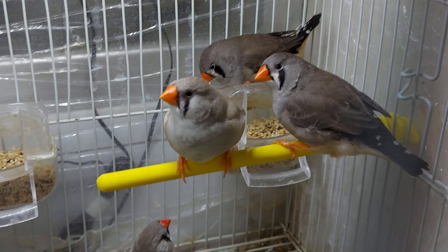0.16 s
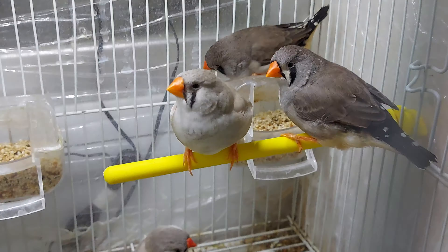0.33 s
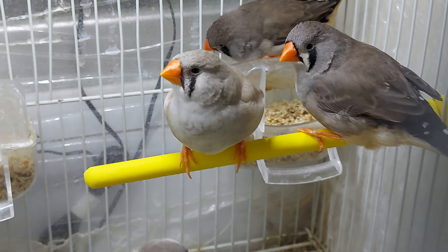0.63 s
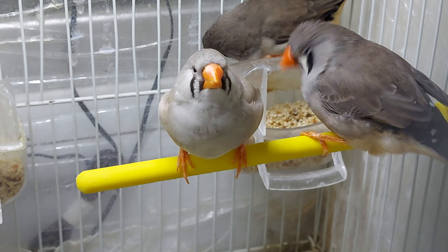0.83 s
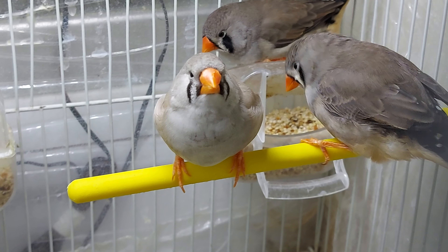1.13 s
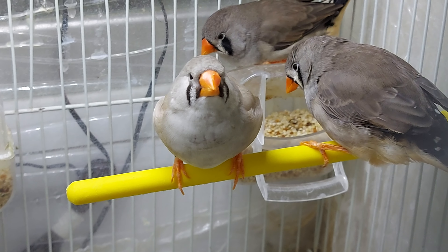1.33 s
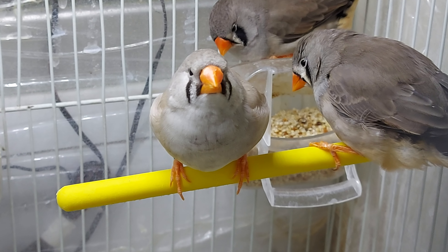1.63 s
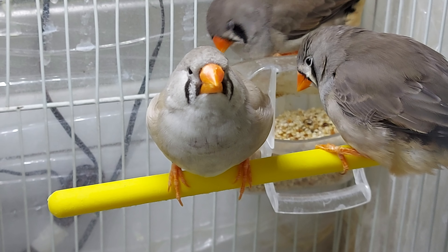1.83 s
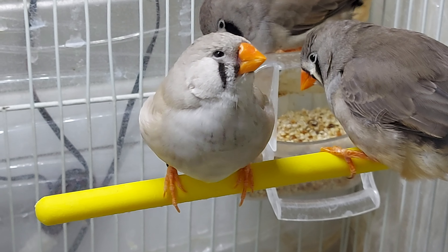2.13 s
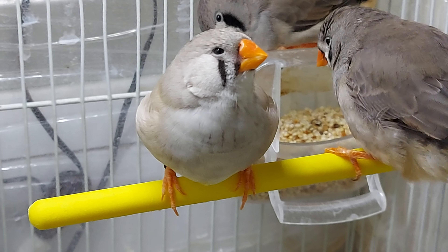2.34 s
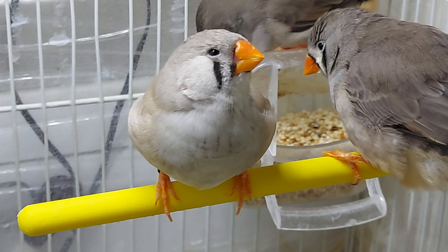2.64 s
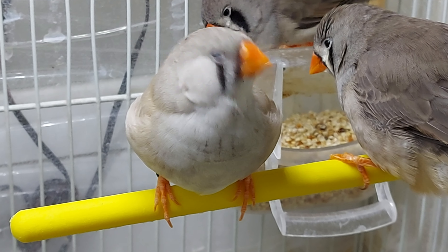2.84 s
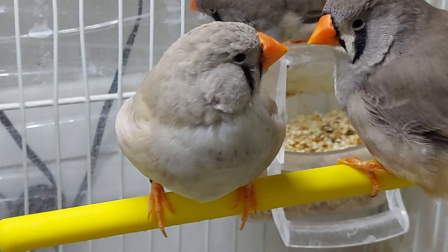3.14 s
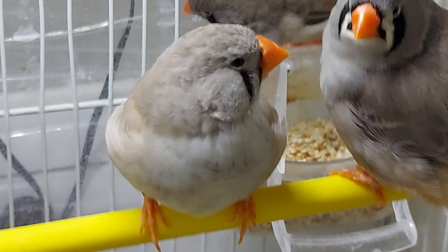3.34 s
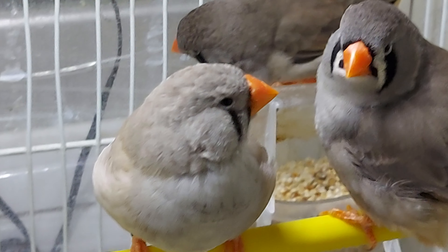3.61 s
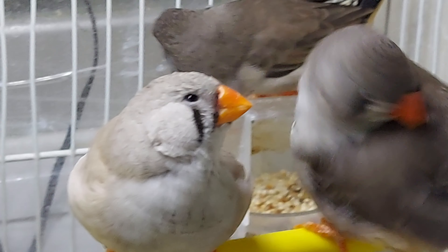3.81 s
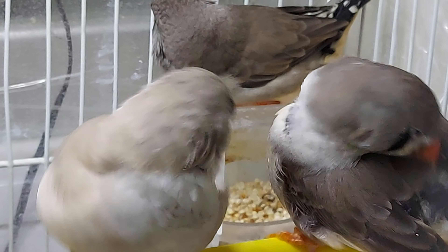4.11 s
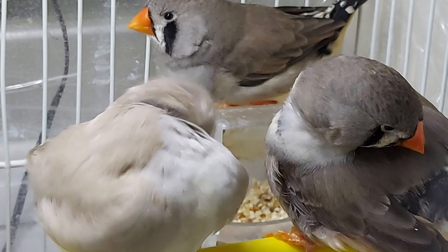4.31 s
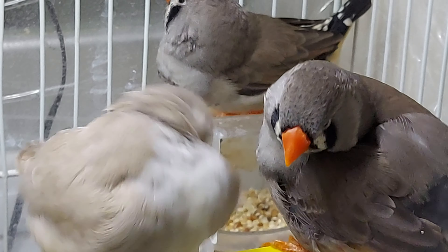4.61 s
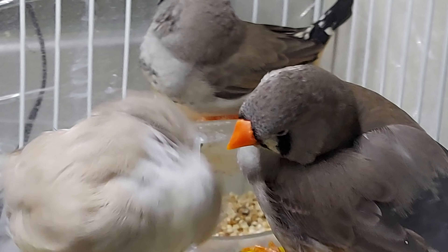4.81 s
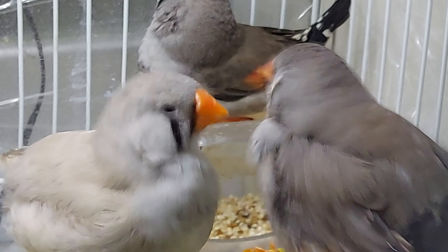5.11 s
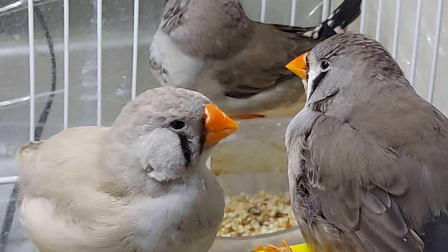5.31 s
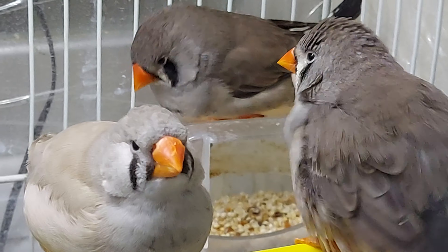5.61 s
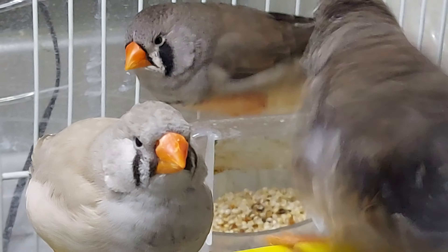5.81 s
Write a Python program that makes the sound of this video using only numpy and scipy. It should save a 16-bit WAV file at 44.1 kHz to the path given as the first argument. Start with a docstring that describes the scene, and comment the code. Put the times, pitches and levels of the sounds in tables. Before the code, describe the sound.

A low hum dies away and a zebra finch gives two quick, loud, rasping calls from a little way off. Quieter nasal notes and a short rough squawk answer from a perch right by the microphone, among light ticks, faint seed crackle, thin whistles and feather shuffles. A bird shakes its wings to finish. The wire cage stands in a small room, and the hand-held microphone rumbles softly and is bumped twice.

```python
"""Two loud zebra finch calls arch and fall into a rasp; soft nasal notes and a squawk answer.
The birds are in a wire cage in a small room, the microphone a hand-held phone close to the perch,
the loud caller further off to the right. Each voice is a pulsing syrinx shaped by throat and beak.
Beaks and claws tick, feathers rustle, thin whistles pass, and wings whirr at the end.
A low hum dies away at the start; the hand rumbles and twice knocks the left microphone port."""
import sys
import numpy as np
from scipy import signal
from scipy.fft import rfft, irfft, next_fast_len
from scipy.io import wavfile
from scipy.ndimage import uniform_filter1d

SR = 44100
rng = np.random.default_rng(int(sys.argv[2]) if len(sys.argv) > 2 else 0)


def master_out(mix):
    """Clip the mix to full scale and print it as 16-bit PCM to the path in sys.argv[1]."""
    frames = np.transpose(np.atleast_2d(mix))
    ceiling = np.clip(frames, -1, 1)
    pcm = np.round(ceiling * 32767).astype(np.int16)
    wavfile.write(sys.argv[1], SR, pcm)


N = 262395
TIME = np.arange(N) / SR
TOP_HZ = 16050


def undb(db):
    """Decibels to gain."""
    return 10 ** (np.asarray(db) / 20)


def unit(x):
    """Scale to rms 1."""
    return x / np.sqrt(np.mean(x ** 2) + 1e-18)


def place(pan_db):
    """Left and right gains, the left louder by pan_db."""
    return undb(np.array([[pan_db], [-pan_db]]) / 2)


def colour(x, points):
    """Minimum-phase filter through (frequency [Hz], gain [dB]) points."""
    size = next_fast_len(x.shape[-1] + 4096, real=True)
    size += size % 2
    hz, db = np.transpose(points)
    bin_hz = np.fft.rfftfreq(size, 1 / SR)
    log_gain = np.log(undb(np.interp(np.log(bin_hz + 1), np.log(hz), db)))
    cepstrum = irfft(log_gain)
    cepstrum[1:size // 2] *= 2
    cepstrum[size // 2 + 1:] = 0
    return irfft(rfft(x, size) * np.exp(rfft(cepstrum, size)))[..., :x.shape[-1]]


def walk(t, rate):
    """Random wander through rate new values a second."""
    knots = rng.standard_normal(16384)
    return np.interp((t - t[0]) * rate, np.arange(len(knots)), knots)


def span(start, length):
    """Sample times of a gesture, in seconds."""
    return np.arange(int(start * SR), int((start + length) * SR)) / SR


def fade(t, attack_s, release_s):
    """Attack, hold, release: -1 at both ends of a gesture, 0 while it holds."""
    return np.minimum(np.minimum((t - t[0]) / attack_s, (t[-1] - t) / release_s), 1) - 1


def add(out, start, x):
    """Mix x in from start seconds on."""
    first = int(start * SR)
    out[:, first:first + x.shape[-1]] += x[..., :N - first]


def stereo_noise(count, likeness):
    """Left and right noise with correlation likeness."""
    both, *own = rng.standard_normal((count, 3)).T
    return np.sqrt(likeness) * both + np.sqrt(1 - likeness) * np.array(own)


def hum():
    """A wavering low tone that dies away, alike in both ports."""
    out, t = np.zeros((2, N)), span(0, .45)
    hz = 76.6 + 2 * walk(t, 23.7)
    tone = unit(np.sin(2 * np.pi * np.cumsum(hz) / SR))
    db = -37.5 - 34 * t + walk(t, 10.4)
    add(out, 0, tone * undb(db) * (1 + fade(t, attack_s=.0097, release_s=.043)))
    return out


def hand_rumble():
    """Low handling noise from the hand that holds the microphone."""
    # course of the rumble: (time [s], level [dB])
    levels = [(0.4, -50), (0.46, -56.5), (0.94, -49), (1.28, -62.5), (1.34, -56.5), (2.3, -48), (2.72, -51),
              (2.78, -43), (3.03, -50), (3.18, -45.5), (3.85, -55), (4.22, -47), (4.31, -56.5),
              (4.82, -50.5), (4.91, -57.5), (5.44, -56.5), (5.45, -52), (5.95, -53)]
    # its spectrum: (frequency [Hz], gain [dB])
    spectrum = [(12, -43), (24, -27), (42, 0.5), (60, -22.5), (80, 2), (100, -5.5), (140, -4), (195, -21.5),
                (260, -22.5), (380, -44.5), (600, -92.5)]
    rumble = unit(colour(stereo_noise(N, likeness=.88), spectrum))
    return rumble * undb(np.interp(TIME, *np.transpose(levels)))


def room_air():
    """Soft room tone that slowly ebbs and swells."""
    # spectrum of the air: (frequency [Hz], gain [dB])
    spectrum = [(120, -15), (200, -11.5), (340, 0), (558, -15), (696, -11), (933, -16), (2090, -19.5),
                (3020, -28.5), (7270, -22), (9230, -30.5), (12600, -20), (16000, -31)]
    # its swell: (time [s], gain [dB])
    swell = [(0, 5), (.55, -4), (1.2, -4), (2.6, -.5), (4.6, -.5), (5.35, -2.5), (5.95, 1)]
    air = unit(colour(stereo_noise(N, likeness=.5), spectrum))
    return air * undb(-65.5 + np.interp(TIME, *np.transpose(swell)))


def husk(body_db, treble_db):
    """Spectrum of light contacts on seed, wire and plastic: (frequency [Hz], gain [dB])."""
    return [(80, body_db - 10), (300, body_db + 9), (800, body_db), (1800, -2.5), (3200, -11.5),
            (5500, treble_db - 5.5), (9000, treble_db - 11), (14000, treble_db - 4)]


def ticks():
    """Beaks and claws strike around the cage, each a sharp crack that dies quickly."""
    # contacts: (time [s], onset level [dB], body [dB], treble [dB], T60 [s], left minus right [dB])
    contacts = [(0.0127, -33.5, -29, -4.5, 0.002, -14.5), (1.066, -50.5, -22, -1, 0.15, -2),
                (1.376, -54.5, -15, 11, 0.07, -4), (1.496, -48, -22, 0, 0.0056, -4),
                (1.524, -40.5, -10.5, -12.5, 0.0044, -3), (1.586, -45, -14, 1.5, 0.03, -1.5),
                (1.793, -45.5, -6, -13, 0.0055, -1.5), (1.832, -43, 3.5, -22, .06, 4),
                (2.018, -47, -5, -8.5, 0.042, -1), (2.077, -45, -3, -28, 0.015, 6),
                (2.648, -47.5, -1.5, -6, 0.0062, 6.5), (2.67, -51.5, -5, -3, .026, 7),
                (2.972, -51.5, 5, -14, 0.014, 7), (3.448, -43.5, -7, -10, 0.028, 21),
                (3.669, -51.5, 19.5, 10, .034, -1), (4.409, -50, -28, 4, 0.024, 9),
                (4.667, -36.5, -8.5, 2.5, .019, 1.5), (4.747, -46.5, -33, 3, 0.0037, -18.5),
                (5.146, -48, -12, 5.5, 0.023, -3), (5.695, -54, -19.5, 14, .026, -6),
                (5.785, -37, 1, 21, 0.054, 1), (5.898, -32.5, -21, -12.5, .012, 8.5)]
    out, t = np.zeros((2, N)), TIME[:SR // 6]
    for start, db, body_db, treble_db, t60, pan_db in contacts:
        burst = stereo_noise(len(t), likeness=.25) * undb(-60 * t / t60)
        crack = colour(burst, husk(body_db, treble_db))
        onset_rms = np.std(crack[:, :SR // 400])
        add(out, start, crack / onset_rms * undb(db) * place(pan_db))
    return out


def shuffles():
    """Feathers and feet scrape in grainy swells, a little left of centre."""
    # scrapes: (time [s], level [dB], decay time [s], body [dB], treble [dB])
    scrapes = [(.202, -57, 0.042, 8, -2), (0.934, -48, 0.091, 27, 22.5), (1.307, -54, .033, 4.5, -7),
               (1.843, -55.5, 0.078, 6, -18), (2.027, -52, 0.038, -8.5, -11),
               (2.716, -58, 0.09, -6.5, -11.5), (2.843, -56.5, .059, -11, -9.5),
               (3.226, -45.5, .039, -15, 0), (3.331, -55, 0.1, -1, -7.5), (3.43, -52.5, 0.04, -5.5, -17),
               (3.684, -50.5, 0.033, 5, -22), (3.931, -53.5, 0.063, -3.5, -1.5),
               (4.208, -56, 0.18, -4.5, -1), (4.687, -61.5, 0.17, -8.5, -9.5), (4.87, -48.5, 0.035, -5, -8),
               (5.214, -57.5, .065, 0.5, -10)]
    out, t = np.zeros((2, N)), TIME[:SR // 2]
    rise = np.minimum(t / .009, 1)
    for start, db, decay_s, body_db, treble_db in scrapes:
        grains = stereo_noise(len(t), likeness=.16) * undb(4.9 * walk(t, 233.6))
        scrape = unit(colour(grains, husk(body_db, treble_db)))
        envelope = rise * np.exp(-(t / decay_s) ** 2)
        add(out, start - .004, scrape * envelope * undb(db) * place(pan_db=2.1))
    return out


def seed_crackle():
    """Seed husks crackle faintly at random moments."""
    cracks_per_s, t60 = 20, .012
    cracks = (rng.random(N) < cracks_per_s / SR) * undb(np.minimum(4 * rng.exponential(size=N), 8))
    envelope = signal.fftconvolve(cracks, undb(-60 * TIME[:SR // 2] / t60))[:N]
    crackle = envelope * stereo_noise(N, likeness=.35)
    return undb(-63) * colour(crackle, husk(body_db=-5, treble_db=1))


def syrinx(t, hz, db, rough, throat, jitter, flutter_hz, shimmer_db, hiss, treble_air):
    """Pulses ring through the throat; roughness shakes pitch and strength and lets air hiss through."""
    phase = 2 * np.pi * np.cumsum(hz * (1 + jitter * rough * walk(t, flutter_hz))) / SR
    harmonics = np.arange(1, 45)[:, None]
    # the partials waver one by one as beak and head move
    waver = undb(2.5 * np.array([walk(t, 60) for _ in harmonics]))
    pulses = unit(np.sum(waver * np.cos(harmonics * phase) * (harmonics * hz < TOP_HZ), axis=0))
    puffs = (1 + np.cos(phase)) * rng.standard_normal(N)[:len(t)]
    # the highest partials always dissolve into air
    high_puffs = signal.sosfilt(signal.butter(4, 6000, "high", fs=SR, output="sos"), puffs)
    air = hiss * rough * puffs + treble_air * high_puffs
    shimmer = undb(shimmer_db * rough * walk(t, flutter_hz))
    voice = colour(pulses * shimmer + air, throat)
    power = uniform_filter1d(voice ** 2, size=400)
    edges = 1 + fade(t, attack_s=.008, release_s=.008)
    return voice / np.sqrt(power + 1e-12) * undb(db) * edges


def at_ports(t, voice, shading, right_lag_s):
    """The phone's body shades each microphone port differently, and sound reaches one of them first."""
    left = colour(voice, [(hz, pan_db / 2) for hz, pan_db in shading])
    right = colour(voice, [(hz, -pan_db / 2) for hz, pan_db in shading])
    return np.array([left, np.interp(t - right_lag_s, t, right)])


def loud_calls():
    """A bird further off to the right calls twice: a clear arch that breaks into a falling rasp."""
    # calls: (start [s], crest [s], length [s], attack [s], top pitch [Hz], tone [dB], rasp [dB])
    calls = [(0.615, .641, 0.12, .02, 905.2, -31.5, -29), (.793, .822, 0.12, .015, 915, -25, -28.5)]
    # throat and beak resonances: (frequency [Hz], gain [dB])
    throat = [(400, -44), (850, -28.5), (1250, -27.5), (1800, -20.5), (2650, -16), (3650, -7),
              (4450, -13.5), (5200, -26.5), (7000, -41), (8600, -32), (11500, -42.5), (13500, -38.5),
              (15300, -33.5)]
    # port shading toward this bird: (frequency [Hz], left minus right [dB])
    shading = [(800, 4), (1300, -2), (2400, -1), (3600, -7), (4400, -9), (9000, -6)]
    rise_s, sink_s, floor_share = .035, .034, .53
    clear_rough, rasp_rough, break_s = .19, .85, .033
    out = np.zeros((2, N))
    for start, crest, length, attack_s, top_hz, tone_db, rasp_db in calls:
        t = span(start, length)
        arch = 1 / (1 + ((t - crest) / np.where(t < crest, rise_s, sink_s)) ** 2)
        hz = top_hz * (floor_share + (1 - floor_share) * arch)
        broken = 1 - np.exp(-(np.maximum(t - crest, 0) / break_s) ** 2)
        db = tone_db + (rasp_db - tone_db) * broken + 19.5 * fade(t, attack_s, release_s=.039)
        rough = clear_rough + (rasp_rough - clear_rough) * broken
        voice = syrinx(t, hz, db, rough, throat,
                       jitter=.06, flutter_hz=606.7, shimmer_db=10, hiss=1, treble_air=.85)
        add(out, start, at_ports(t, voice, shading, right_lag_s=-.0002))
    return out


def whistles():
    """Faint, wavering whistles and a squeak; pitch and level slide away either side of an early crest."""
    # arches: (start [s], length [s], top pitch [Hz], crest level [dB])
    arches = [(1.44, 0.23, 1858, -69), (2.39, .25, 6270, -73), (3.227, 0.042, 5780, -55),
              (4.079, .4, 11340, -67)]
    crest_share, rounding_s, slide_octaves_per_s = .33, .03, 1.2
    out = np.zeros((2, N))
    for start, length, top_hz, top_db in arches:
        t, rise_s = span(start, length), crest_share * length
        from_crest_s = np.hypot(t - start - rise_s, rounding_s) - rounding_s
        hz = top_hz * 2 ** (-slide_octaves_per_s * from_crest_s)
        phase = 2 * np.pi * np.cumsum(hz * (1 + .02 * walk(t, 2000))) / SR
        db = top_db + 14 * fade(t, rise_s, length - rise_s) + 4 * walk(t, 80)
        add(out, start, unit(np.sin(phase)) * undb(db))
    return out


def perch_voice(t, hz, db, rough, throat):
    """A bird's voice from the perch, close to the microphone on its left."""
    # port shading toward the perch: (frequency [Hz], left minus right [dB])
    shading = [(400, 4.7), (1300, 8.2), (2500, 6.8), (4300, 4.4), (12000, 0.5)]
    voice = syrinx(t, hz, db, rough, throat,
                   jitter=.05, flutter_hz=517, shimmer_db=3, hiss=.86, treble_air=.71)
    return at_ports(t, voice, shading, right_lag_s=.00006)


def soft_calls():
    """Nasal contact notes from the perch: one push of effort lifts pitch and level and clears the tone."""
    # notes: (start [s], crest [s], length [s], resting pitch [Hz], top pitch [Hz], crest level [dB])
    notes = [(2.286, 2.337, .082, 380, 454, -36.8), (3.124, 3.173, .082, 359.4, 407.7, -40.5),
             (5.465, 5.511, .075, 389, 464, -34.3)]
    # throat and beak resonances, one list a note: (frequency [Hz], gain [dB])
    throats = [
        [(430, -18), (880, -6), (1350, -4), (1800, -15), (2300, -5), (2700, 2), (3150, -3.5), (3600, 4.5),
         (4200, -12.5), (5500, -18.5), (7500, -24), (10000, -16), (12000, -35)],
        [(400, -17.5), (800, -2), (1200, -15), (1600, -8.5), (2050, 2), (2450, -2), (3200, -7), (4000, -10),
         (5000, -27), (8000, -23.5), (14000, -27)],
        [(450, -21), (930, -8), (1400, -6.5), (1850, -13), (2320, 2.5), (2800, -5), (3250, -3), (3700, 4),
         (4200, -17), (4650, -13), (5500, -20), (8000, -17), (12000, -34)],
    ]
    push_s, push_flatness, push_db = .025, 3.07, 8.5
    slack_rough, pushed_rough = .3, .07
    out = np.zeros((2, N))
    for (start, crest, length, rest_hz, top_hz, top_db), throat in zip(notes, throats):
        t = span(start, length)
        effort = np.exp(-np.abs((t - crest) / push_s) ** push_flatness)
        hz = rest_hz + (top_hz - rest_hz) * effort
        db = top_db + push_db * (effort - 1) + 6 * fade(t, attack_s=.011, release_s=.011)
        crack = .5 * np.exp((t - t[-1]) / .012)  # the voice cracks as it lets go
        rough = slack_rough + (pushed_rough - slack_rough) * effort + crack
        add(out, start, perch_voice(t, hz, db, rough, throat))
    return out


def port_knocks():
    """The hand knocks the left port: a sharp push of pressure, a slower pull, a brief ring of the case."""
    # knocks: (time [s], level [dB], push width [s], click against push [dB])
    knocks = [(3.0357, -8.5, 0.0001, 0.5), (4.7999, -12, 0.00016, -32)]
    port_hz, case_t60, right_db = 11000, .027, -30
    case_spectrum = [(200, -10.5), (1800, -18.5), (4000, -29.5), (15000, -38)]
    out, t = np.zeros((2, N)), TIME[:SR // 25] - .001
    pull = .5 * np.exp(-((t - .0003) / .00011) ** 2) + .13 * np.exp(-((t - .0007) / .0011) ** 2)
    for start, db, width_s, click_db in knocks:
        push = np.exp(-(t / width_s) ** 2)
        # the narrow port itself rings for a couple of cycles
        click = undb(click_db) * np.cos(2 * np.pi * port_hz * t) * np.exp(-np.abs(t) / .00008)
        ring = unit(colour(rng.standard_normal(len(t)), case_spectrum))
        ring *= (t > 0) * undb(-29 - 60 * t / case_t60)
        knock = undb(db) * (push - pull + click) + ring
        add(out, start + t[0], knock * undb([[0], [right_db]]))
    return out


def squawk():
    """A short, rough squawk from the perch swells and fades as it drops about an octave."""
    # throat and beak resonances: (frequency [Hz], gain [dB])
    throat = [(240, -56), (400, -12), (921, 1), (1450, -4), (2250, 8), (2470, -5), (2830, 6.5),
              (3500, -4.5), (15000, -18.5)]
    start, top_hz, fall_octaves_per_s = 3.387, 717, 22.5
    out, t = np.zeros((2, N)), span(start, length=.047)
    hz = top_hz * 2 ** (-fall_octaves_per_s * (t - t[0]))
    db = -39 + 18 * fade(t, attack_s=.017, release_s=.017)
    add(out, start, perch_voice(t, hz, db, rough=.57, throat=throat))
    return out


def wings():
    """A bird shakes out its wings: quick beats of dense, uneven feather strokes."""
    # spectrum of the feathers: (frequency [Hz], gain [dB])
    spectrum = [(90, -23), (150, -0.5), (380, 6), (900, -9), (1700, -7.5), (2500, -10), (4200, -6.5),
                (6300, -2.5), (9000, -17), (13000, 0.5), (16000, -16)]
    start, beat_hz, beat_db = 5.755, 25.1, 2.5
    out, t = np.zeros((2, N)), span(start, length=.2)
    db = -44.5 + 18 * fade(t, attack_s=.058, release_s=.046)
    beats = np.cos(2 * np.pi * beat_hz * (t - t[0]))
    strokes = undb(beat_db * beats + 3.2 * walk(t, 108) + 2 * walk(t, 900))
    whirr = unit(colour(stereo_noise(len(t), likeness=.16) * strokes, spectrum))
    add(out, start, whirr * undb(db))
    return out


def room(x, early_db, late_db):
    """The direct sound, quick echoes from the cage walls, then the short ring of the room."""
    cage_t60, low_t60, treble_t60 = .03, .28, .24
    t = TIME[:SR // 2]
    early, late = rng.standard_normal((2, 2, len(t)))
    echoes = (rng.random(early.shape) < .06) * (t > .001)
    early = early * echoes * undb(-60 * t / cage_t60)
    low = signal.sosfilt(signal.butter(2, 4500, fs=SR, output="sos"), late)
    treble = .63 * (late - low)
    late = (low * undb(-60 * t / low_t60) + treble * undb(-60 * t / treble_t60)) * (t > .005)
    response = (undb(early_db) * unit(early) + undb(late_db) * unit(late)) / np.sqrt(len(t))
    return x + signal.fftconvolve(x, response, axes=1)[:, :N]


def scene():
    """The loud bird is further off, so more room is heard with it; the perch is close and nearly dry."""
    far = room(loud_calls(), early_db=0, late_db=-4.5)
    perch = room(soft_calls() + squawk(), early_db=-11, late_db=-19)
    fidgets = room(ticks() + shuffles() + seed_crackle() + wings(), early_db=-5.5, late_db=-11.5)
    return far + perch + fidgets + whistles() + port_knocks() + hum() + hand_rumble() + room_air()


def record(dry):
    """The phone cuts the treble steeply above TOP_HZ."""
    return signal.sosfilt(signal.ellip(8, .2, 70, TOP_HZ, fs=SR, output="sos"), dry)


dry = scene()
out = record(dry)
master_out(out)
```